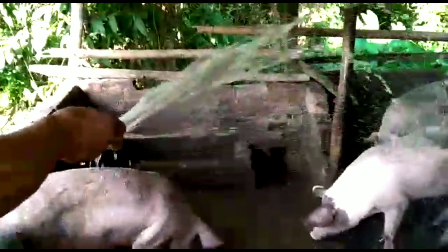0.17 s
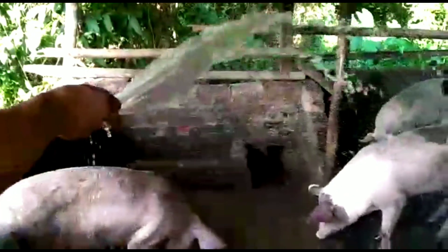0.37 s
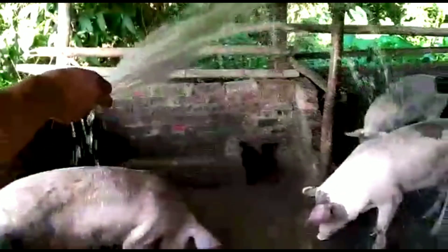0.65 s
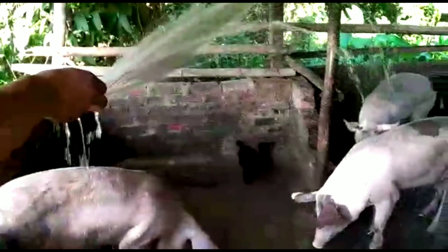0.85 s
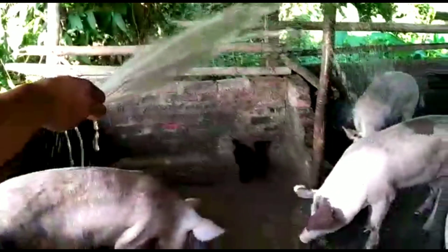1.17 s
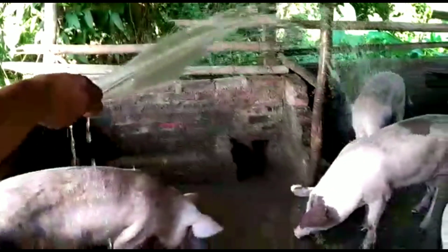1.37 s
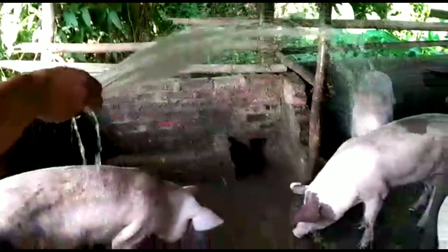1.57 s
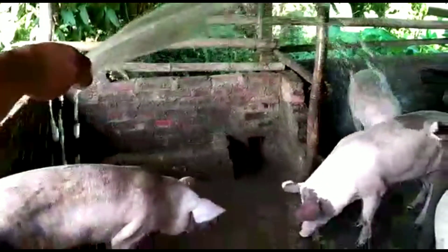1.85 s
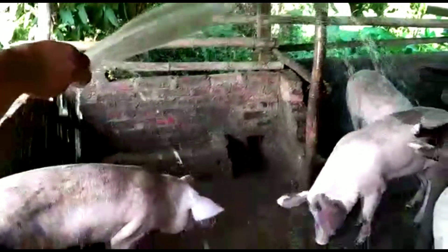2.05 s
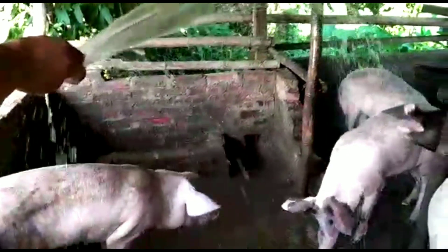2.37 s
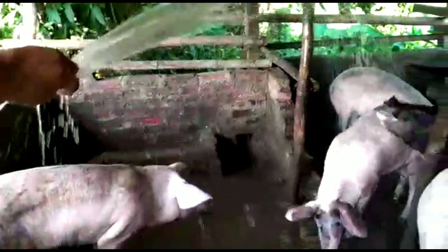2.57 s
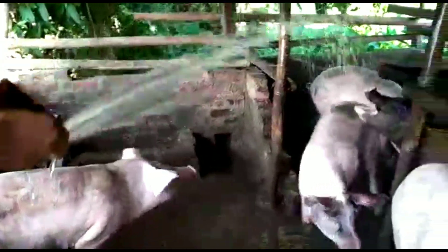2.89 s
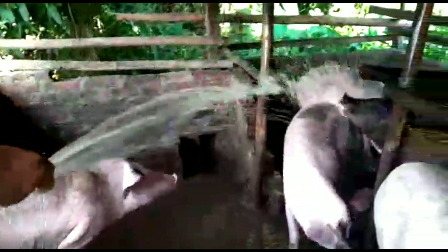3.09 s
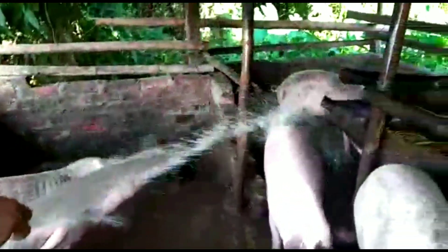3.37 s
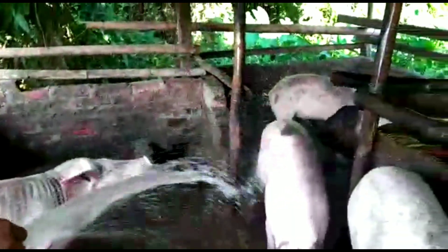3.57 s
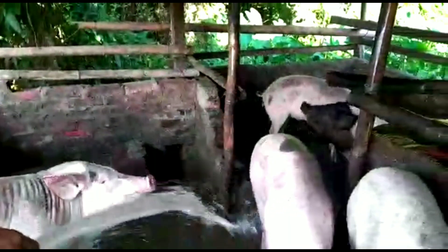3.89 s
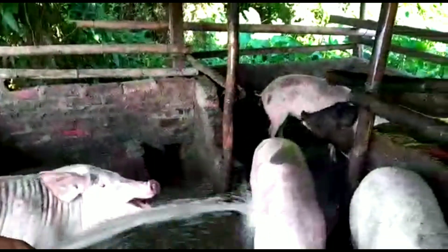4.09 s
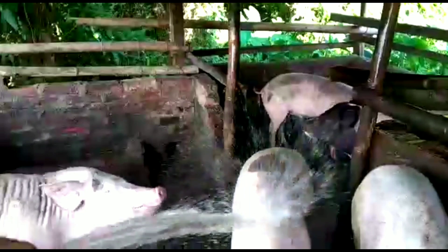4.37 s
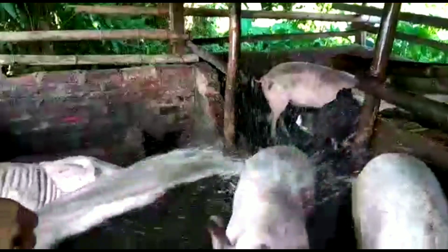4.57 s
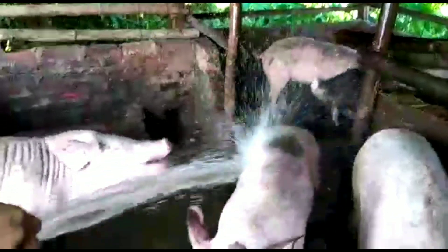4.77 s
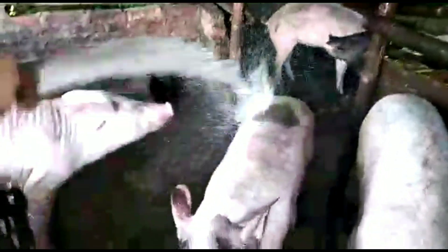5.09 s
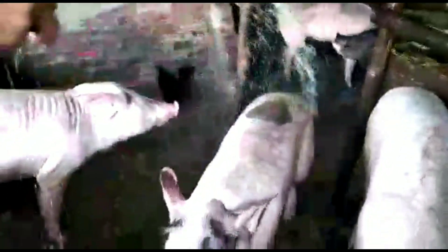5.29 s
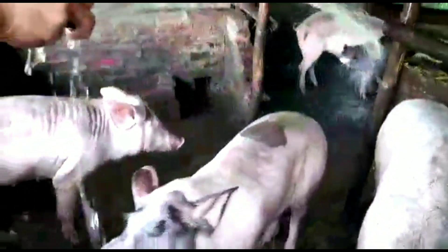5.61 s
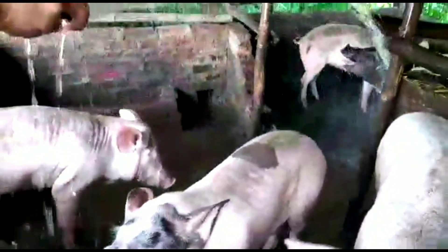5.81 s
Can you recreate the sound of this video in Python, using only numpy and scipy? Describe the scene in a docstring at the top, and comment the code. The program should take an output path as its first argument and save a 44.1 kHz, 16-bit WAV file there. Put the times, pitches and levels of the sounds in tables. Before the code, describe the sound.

Water from a hand-held hose is heard very close, in wide stereo, in an open pen with pigs. From the start the jet makes a bright, airy fizz with tiny glassy spits, while water breaks on the wet floor in mid-pitched splatter, crackle and gurgling bubbles. It surges unevenly: fuller gushes and sharp slaps come around 0.8 to 1.4 seconds, again near 1.9, and near 3.3. Crisp single drops pop near the microphone throughout. Beneath lie a soft low rumble, a wavering pump hum with a faint steady whine, and a slow engine further away, throbbing louder after about 3.5 seconds. Around 3.9 to 4.3 seconds the full jet pounds the floor with a lower wash and drums on hides. From about 4.9 to 5.5 seconds hollow wet knocks cluster, with drumming strongest near 5.3. Spray and splashes continue to the end, with another knock near 5.9.

```python
"""A hand-held hose sprays a fan of water over pigs and the wet floor of an open pen, close to two microphones.
From the start the jet fizzes at the thumb and splatters where it lands, while a pump hums and whines.
Slugs slap down and drops burst close by throughout; a slow engine further off throbs louder as time passes.
About four seconds in, the full jet pounds the floor; hides drum loudly then and again after five seconds,
with a cluster of wet knocks. Water is noise, bursts and short tones; machines are sines over a rumble."""
import sys
import numpy as np
from scipy import signal
from scipy.io import wavfile
from scipy.ndimage import uniform_filter1d

SR = 44100
rng = np.random.default_rng(int(sys.argv[2]) if len(sys.argv) > 2 else 0)


def dump_mix(stems):
    """Bounce the given channels to the path in sys.argv[1] as a 16-bit WAV at rate SR."""
    frames = np.atleast_2d(stems).T  # one column per channel
    limited = np.clip(frames, -1, 1)  # hard clip at full scale
    pcm = np.round(limited * 32767).astype(np.int16)
    wavfile.write(sys.argv[1], SR, pcm)


N = 261954  # samples in the scene


def amp(db):
    """Gain of a level in dB."""
    return 10 ** (np.asarray(db) / 20)


def evened(x):
    """Scaled to rms 1."""
    return x / np.sqrt(np.mean(x ** 2) + 1e-20)


def read(points, hz):
    """A spectrum table on a log-frequency axis."""
    f, value = np.transpose(points)
    return np.interp(np.log(hz + 1), np.log(f + 1), value)


def track(rows, column, t):
    """One column of a curve table at times t."""
    rows = np.array(rows)
    return np.interp(t, rows[:, 0], rows[:, column])


def drift(shape, *spans):
    """Random field of rms 1, smoothed over a span along each axis."""
    field = rng.standard_normal(shape)
    for axis, span in enumerate(spans):
        field = uniform_filter1d(field, max(int(span), 1), axis)
    return evened(field)


def add(mix, s, sound):
    """Mixes a two-channel sound in at time s."""
    part = mix[:, round(s * SR):][:, :sound.shape[1]]
    part += sound[:, :part.shape[1]]


def at_microphones(source, colour, size):
    """Colours two unrelated signals and mixes them as two spaced microphones hear them."""
    # Each row: frequency in Hz, left-right likeness from 0 to 1.
    likeness = [(60, 0.76), (200, 0.94), (500, 0.6), (1000, 0.74), (2000, 0.3), (6000, 0.038),
                (15000, 0.017)]
    # The phone body shades each microphone differently. Each row: frequency in Hz, left over right in dB.
    shading = [(60, -0.5), (250, 1), (1400, -3), (2200, -2.5), (3200, 2), (4400, 0.5), (5300, 1.5),
               (6200, 0), (7300, -3), (10200, -3), (11200, -1), (12500, 8), (13800, 0.5), (15000, -13.5)]
    # Arrival of the shared part. Each row: time in seconds, lead of the left in samples.
    left_lead = [(0, 9), (1, 9.5), (2.5, 5.5), (4.5, 5), (5.94, 8)]
    hz, t, (right, other) = signal.stft(source, SR, nperseg=size, noverlap=3 * size // 4)
    same = np.clip(read(likeness, hz), 0, 1)[:, None]
    early = np.exp(2j * np.pi * np.outer(hz / SR, track(left_lead, 1, t)))
    left = same * early * right + np.sqrt(1 - same ** 2) * other
    tilt = amp(read(shading, hz) / 2)[:, None]
    heard = np.array([left * tilt, right / tilt]) * amp(colour(hz, t))
    return signal.istft(heard, SR, nperseg=size, noverlap=3 * size // 4)[1][:, :N]


def surging(rows, column, surge_db):
    """A level curve in dB with chance surges on top: lumps of the jet arrive suddenly and trail off."""
    lumps_per_s, trail_s, step_s = 45, 0.023, .002
    t, steps = np.arange(N) / SR, np.arange(0, N / SR + .01, step_s)
    lumps = rng.exponential(1, len(steps)) * (rng.random(len(steps)) < lumps_per_s * step_s)
    surges = signal.lfilter([1], [1, -np.exp(-step_s / trail_s)], lumps)
    return track(rows, column, t) + surge_db * np.interp(t, steps, evened(surges - surges.mean()))


def gushes():
    """Heavy gushes as swells in dB, each with a quick start and a rounded fade."""
    # Each row: start in seconds, swell in dB before a layer takes its share, fade in seconds.
    rows = [(.585, 6, 0.054), (.893, 3, 0.018), (.948, 8.5, 0.079), (1.084, 10, 0.016), (1.167, 7, 0.013),
            (1.297, 8, 0.058), (1.355, 7, 0.018), (1.575, 3, 0.035), (1.935, 11, 0.033), (2.028, 1, .03),
            (2.44, 7, 0.025), (3.09, 2, 0.045), (3.232, 5.5, 0.045), (3.251, 1.5, 0.019), (3.281, 6, 0.046),
            (3.375, 8.5, 0.064), (3.67, 1.5, 0.075), (3.718, 4.5, 0.025), (3.84, 0, 0.04),
            (4.007, 4.5, 0.033), (4.084, 3, 0.056), (4.148, 8, 0.022), (4.32, 4.5, 0.068),
            (5.175, 6, 0.066), (5.419, 8.5, 0.033), (5.545, 5, 0.027)]
    t, rise_s = np.arange(N) / SR, 0.001
    swell_db = np.zeros(N)
    for s, db, fade_s in rows:
        swell_db += db * np.clip((t - s) / rise_s, 0, 1) * np.exp(-((t - s) / fade_s) ** 2)
    return swell_db


def water(spectrum, level_db, drops_per_s, spread_db, drop_share, patchy_db, flicker_db):
    """Dense far noise plus near drops; random patches over pitch and time, and a flicker of all pitches."""
    drop_sizes = amp(spread_db * np.minimum(rng.exponential(1, N), 5))
    sizes = drop_sizes * (rng.random((2, N)) < drops_per_s / SR)
    ring = np.exp(-np.arange(90) / 22)  # each drop is a burst fading in half a millisecond
    drops = signal.oaconvolve(sizes, ring[None], axes=1)[:, :N] * rng.standard_normal((2, N))
    share = np.clip(drop_share, 0, 1)  # share of the power
    source = np.sqrt(share) * evened(drops) + np.sqrt(1 - share) * rng.standard_normal((2, N))

    def colour(hz, t):
        """Spectrum in dB, with random patches over pitch and time and a flicker common to all pitches."""
        patches = patchy_db * drift((len(hz), len(t)), 2, 20)
        flicker = flicker_db * drift((1, len(t)), 1, 14)
        return read(spectrum, hz)[:, None] + patches + flicker
    return amp(level_db) * evened(at_microphones(source, colour, 256))


def short_tones(per_s, low_hz, high_hz, cycles, spread_db):
    """Short rising tones at chance times, as trapped air rings, dying away over a number of cycles."""
    out = np.zeros((2, N + SR))
    at = np.flatnonzero(rng.random(N) < per_s / SR)
    sizes = amp(spread_db * np.minimum(rng.exponential(1, N), 4))[at]
    kinds = rng.integers(0, 32, N)[at]
    for k, hz in enumerate(np.geomspace(low_hz, high_hz, 32)):
        steps = np.arange(int(3 * cycles * SR / hz))
        turns = steps * hz / SR
        envelope = np.exp(-turns / cycles) * (1 - np.exp(-turns))
        tone = np.sin(2 * np.pi * turns * (1 + 0.00151 * turns)) * envelope
        places = at[kinds == k, None] + steps
        sound = sizes[kinds == k, None] * tone
        out[k % 2] += np.bincount(places.ravel(), sound.ravel(), N + SR)  # pitches alternate sides
    return evened(out + 0.01 * out[::-1])[:, :N]


def burst(hz, width, t60, length=6000):
    """Two-channel noise around hz, quick rise and exponential fall."""
    t = np.arange(length) / SR
    edges = np.clip([hz - width / 2, hz + width / 2], 60, 15000)
    noise = rng.standard_normal((3, length))
    band = signal.butter(2, edges, "band", fs=SR, output="sos")
    noise = signal.sosfilt(band, noise[:2] + 0.33 * noise[2])
    return evened(noise) * amp(-60 * t / t60) * (1 - np.exp(-t / 0.0033))


def fizz(jet_db):
    """The jet tears at the thumb into bright noise with a few single drops."""
    # Each row: frequency in Hz, relative density in dB per Hz.
    spectrum = [(1800, -30.5), (3000, -7.5), (3600, -14), (4300, -6.5), (5200, -4.5), (6200, -4.5),
                (7200, 0.5), (8500, 0), (10200, 2), (11300, -1.5), (12500, -3.5), (13800, -6),
                (15000, -17.5), (15700, -9.5)]
    return amp(3.5) * water(spectrum, jet_db, drops_per_s=1100, spread_db=3.5, drop_share=0.064,
                            patchy_db=2.0, flicker_db=0.7)


def spit_and_shimmer(jet_db):
    """Very short tones and longer thin tones, a glassy shimmer, both following the jet."""
    spit = short_tones(per_s=1200, low_hz=3000, high_hz=6600, cycles=2.5, spread_db=4.0)
    shimmer = short_tones(per_s=700, low_hz=3300, high_hz=7000, cycles=30, spread_db=5.0)
    return amp(jet_db - 16) * (spit + shimmer)


def splatter(landing_db, gush_db):
    """Water breaking on the wet floor: mid-band noise with many drops, swelling with each gush."""
    # Each row: frequency in Hz, relative density in dB per Hz.
    spectrum = [(900, -24), (1400, -11.5), (2000, -7.5), (2350, 1), (2650, 3.5), (2950, 3), (3300, -8),
                (4200, -7), (6500, -19)]
    return amp(1.5) * water(spectrum, landing_db + .75 * gush_db, drops_per_s=1500, spread_db=1.5,
                            drop_share=0.4, patchy_db=1.4, flicker_db=1.2)


def puddle_bubbles(landing_db, gush_db):
    """Air caught in the puddles: long tones gurgle, short ones crackle and crowd together in a gush."""
    gurgle = short_tones(per_s=500, low_hz=1930, high_hz=3238, cycles=35, spread_db=1.0)
    crowd_per_s = 250 * amp(1.3 * gush_db)
    crackle = short_tones(crowd_per_s, low_hz=1900, high_hz=4200, cycles=2.5, spread_db=3.0)
    return amp(landing_db + 0.79 * gush_db - 12.5) * gurgle + amp(landing_db + .3 * gush_db - 7) * crackle


def drumming(drumming_db):
    """Water beats on hides as low noise, with plops of low bubbles equal at both microphones."""
    # Each row: frequency in Hz, relative density in dB per Hz.
    spectrum = [(150, 5.5), (250, -10.5), (400, -9.5), (600, -0.5), (900, -2.5), (1300, 2), (2200, -16)]
    beating = amp(3.5) * water(spectrum, drumming_db, drops_per_s=520, spread_db=1.5, drop_share=0.15,
                               patchy_db=2.5, flicker_db=-1.0)
    plops = short_tones(per_s=220, low_hz=418.5, high_hz=1406, cycles=8.4, spread_db=3.5).mean(0)
    return beating + amp(drumming_db - 5.0) * plops


def pounding():
    """Low wash of the full jet pounding the floor, as noise with uneven drops."""
    # Each row: frequency in Hz, relative density in dB per Hz.
    spectrum = [(120, -17), (200, 5), (300, 0), (450, -6), (800, -16), (1300, -19)]
    # Each row: time in seconds, level in dB before surges.
    level = [(0, -60), (3.8, -59), (3.9, -35), (4.05, -45), (4.25, -33), (4.4, -45), (4.75, -48), (5, -52),
             (5.94, -59)]
    return water(spectrum, surging(level, 1, surge_db=1.5), drops_per_s=580, spread_db=6.0,
                 drop_share=0.18, patchy_db=3.5, flicker_db=0.5)


def slaps():
    """Each slug of water lands with a sharp crack and spreads into spatter that dies in tenths of a second."""
    # Each row: start in seconds, relative level in dB, centre in Hz, left over right in dB.
    rows = [(0.804, -13.5, 3094, 0), (0.892, -19, 2220, -1), (0.9503, -14.5, 2570, -3),
            (0.965, -34, 2320, 1), (0.974, -31, 2800, 0), (1.17, -19, 2800, 2), (1.3075, -12.5, 2520, -1),
            (1.335, -24, 2500, -3), (1.36, -22, 2630, -3), (1.44, -22, 2330, 0), (1.727, -31, 2820, -1),
            (1.935, -31, 2460, -3), (2.184, -17, 2750, -2), (2.4494, -33, 2340, -5), (2.5652, -25, 3070, 1),
            (2.698, -25, 2970, -2), (3.09, -18, 1880, -3), (3.289, -19, 2900, 3), (3.295, -26, 2300, 0),
            (3.384, -25, 2410, -3), (3.844, -20, 2710, 9), (4.019, -13.5, 2600, 5), (4.099, -19, 2840, 11),
            (4.452, -21, 2700, 1), (4.977, -22, 2580, -4), (5.063, -28, 2490, 1), (5.297, -19, 2530, 1),
            (5.358, -15, 2400, -2), (5.499, -14, 3430, 1.5), (5.869, -16, 2460, -7)]
    out, t = np.zeros((2, N)), np.arange(6000) / SR
    for s, db, hz, pan_db in rows:
        crack = np.sin(2 * np.pi * hz * t) * amp(5 - 60 * t / .008) * np.minimum(t / .0008, 1)
        spatter = amp(-3.5) * burst(hz, 1350, 0.17) + amp(-4.5) * burst(6500, 6900, 0.37)
        sides = amp([[pan_db / 2], [-pan_db / 2]])
        add(out, s, amp(db) * sides * (crack + spatter))
    return out


def ticks():
    """Large single drops burst near the microphone as bright noise a few milliseconds long."""
    # Each row: start in seconds, peak in dB.
    rows = [(0.158, -8), (0.365, -10), (0.536, -5), (0.5865, -1.5), (1.1772, -5), (1.501, -2), (2.0078, -6),
            (2.1504, -1), (2.5456, -3.5), (2.7187, -5), (3.0964, -17), (3.2258, -2), (3.607, -6),
            (3.6381, -14), (3.688, -3), (3.9948, -14), (4.2727, -12), (4.3251, -4), (5.5165, -0.5),
            (5.8416, -17), (5.8729, -2)]
    out = np.zeros((2, N))
    for s, db in rows:
        tick = burst(10500, 9900, 0.013, length=400)
        add(out, s, amp(db) * tick / abs(tick).max())
    return out


def knocks():
    """Wet knocks on hide and wood: a smack, and a ring of trapped air, rattle, thud and spatter held a while."""
    # Each row: start in seconds, relative level in dB, starting pitch in Hz, thud share in dB,
    # time in seconds that the water presses on.
    rows = [(0.186, -39, 572, 4, 0.031), (0.639, -42, 285, -5, 0.017), (1.547, -41.5, 580, -17, .03),
            (1.622, -42, 292, -14, 0.024), (2.001, -38, 940, -10, 0.025), (3.669, -41.5, 968, -17, 0.037),
            (4.426, -31, 917, -22, 0.015), (4.862, -29.5, 970, -25, 0.018), (4.937, -30.5, 571, -3, 0.043),
            (4.986, -27, 990, -20, 0.009), (5.052, -38, 1220, -25, 0.016), (5.112, -27.5, 736, -17, 0.0081),
            (5.123, -31.5, 578, -5, 0.029), (5.01, -36.5, 580, -10, 0.013), (5.175, -30, 730, -20, .012),
            (5.19, -31, 588, -14, .015), (5.231, -25, 1576, -32, 0.016), (5.236, -22.5, 2020, -30, 0.029),
            (5.229, -29, 1018, -20, 0.025), (5.297, -22.5, 560, -5, 0.053), (5.298, -37, 1000, -20, .012),
            (5.3, -42, 1303, -25, .015), (5.359, -27, 540, -20, 0.007), (5.361, -30.5, 977, -28, 0.021),
            (5.422, -28.5, 558, -30, 0.03), (5.455, -32, 628, -25, 0.015), (5.52, -33, 723, -25, .02),
            (5.488, -27, 660, -13, 0.031), (5.49, -32, 1010, -25, 0.0088), (5.588, -33, 1085, -19, 0.012),
            (5.696, -37.5, 314, -24, 0.0093), (5.847, -38, 1050, -20, 0.0094), (5.866, -30, 570, -18, 0.11),
            (5.868, -36, 840, -15, 0.051), (5.872, -30, 296.5, -16, 0.093)]
    out, t = np.zeros((2, N)), np.arange(6000) / SR
    for s, db, hz, thud_db, hold_s in rows:
        held = (1 - np.exp(-t / 0.0003)) * amp(-60 * np.maximum(t - hold_s, 0) / 0.06)
        ring = np.sin(2 * np.pi * hz * (t + .9 * t ** 2)) * amp(-60 * t / .35)  # pitch rises
        ring = ring * amp(-2 + 3.5 * drift(len(t), 200))  # broken up by the splashing
        rattle = amp(-5.0) * burst(hz, 270, 1.0).mean(0)
        thud = amp(thud_db) * burst(243, 190, 0.45).mean(0)
        smack = amp(3.5) * burst(1240, 1810, 0.062).mean(0)
        spatter = burst(1420, 1670, 0.17)
        add(out, s, amp(db) * (smack + held * (ring + rattle + thud + spatter)))
    return out


def wander(span):
    """Slow random curve of rms 1 over the scene, smoothed over a span of its 600 steps."""
    t = np.arange(N) / SR
    steps = np.linspace(0, t[-1], 600)
    return np.interp(t, steps, drift(len(steps), span))


def slip():
    """Wandering phase in turns, as the air path shifts."""
    return 0.04 * wander(40)


def pump():
    """The electric pump: a shaft hum with its third harmonic, and a whine of fixed pitch, wavering in level."""
    # Each row: time in seconds, shaft rate in Hz, hum level in dB before wavering.
    rows = [(0, 48, -37), (1.4, 48.1, -34), (1.6, 47.1, -37.5), (1.85, 45.9, -43), (2.0, 46, -36),
            (2.45, 46.5, -44), (2.89, 48.05, -35), (3.5, 47.7, -34.5), (3.79, 48, -38.5), (4.0, 47.5, -46),
            (4.2, 47.5, -39), (4.5, 47.57, -37), (4.9, 47.6, -35), (5.94, 48, -34.5)]
    t = np.arange(N) / SR
    shaft = 2 * np.pi * (np.cumsum(track(rows, 1, t)) / SR + slip())
    hum_db = track(rows, 2, t)
    hum = amp(hum_db + .8 * wander(21) + 1.5 * wander(4)) * np.sin(shaft)
    third = amp(hum_db.mean() - 14 + 2.3 * wander(21)) * np.sin(3 * shaft)
    whine = amp(-50 + 1.5 * wander(21)) * np.sin(2 * np.pi * 1232 * t)
    return np.sqrt(2) * (hum + third) * amp([[.4], [-.4]]) + whine * amp([[2.5], [-2.5]])


def engine():
    """The slow engine's orders: sines loosely in step as firing pulses, each wavering in level."""
    # Each row: multiple of the firing rate, level in dB when far, level in dB when near, before wavering.
    orders = [(1, -55, -55), (3, -53, -52), (4, -53.5, -45), (5, -49, -50), (6, -57, -40.5), (7, -60, -34),
              (8, -55, -45), (10, -51, -48), (11, -81, -41.5), (12, -55, -54), (13, -73, -59)]
    # Each row: time in seconds, firings per second.
    speed = [(0, 16.5), (.7, 16.78), (1.4, 17.14), (2.1, 17.5), (2.8, 17.84), (3.2, 18), (4.3, 18.1),
             (4.9, 17.95), (5.94, 18.15)]
    # Each row: time in seconds, nearness from 0 to 1.
    nearness = [(0, 0), (1.5, 0.34), (3.3, 0.38), (3.8, 0.77), (4.5, 0.95), (5.94, 0.93)]
    t = np.arange(N) / SR
    turns, near = np.cumsum(track(speed, 1, t)) / SR, track(nearness, 1, t)
    throb = np.zeros(N)
    for k, far_db, near_db in orders:
        level_db = far_db + near * (near_db - far_db) + 1.04 * wander(21) + 1.5 * wander(4)
        start = .4 * rng.random()  # random starting phase in turns, which softens the pulses
        throb += amp(level_db) * np.cos(2 * np.pi * (k * turns + start + slip()))
    return np.sqrt(2) * throb * amp([[.4], [-.4]])


def rumble():
    """A low steady rumble behind everything, as coloured noise."""
    # Each row: frequency in Hz, relative density in dB per Hz.
    spectrum = [(12, -24), (22, -1), (32, 4), (43, -1), (65, 12), (102, -3), (166, -3), (357, -22),
                (500, -41), (650, -41), (1100, -120)]
    noise = rng.standard_normal((2, N))
    return amp(-40.5) * evened(at_microphones(noise, lambda hz, t: read(spectrum, hz)[:, None], 1700))


def scene():
    """All sources at the two microphones; layers of the same water share its level curve."""
    # Jet at the thumb. Each row: time in seconds, relative level in dB.
    jet = [(0.0, -14), (0.26, -25), (.33, -25), (.37, -21.5), (.51, -21), (0.59, -15.5), (0.69, -21),
           (0.73, -17), (0.78, -22.5), (0.83, -16.5), (1.01, -19), (1.45, -19.5), (1.6, -17), (1.67, -21.5),
           (1.75, -17.5), (2.2, -19.5), (2.4, -19.5), (2.45, -17), (2.53, -21), (2.56, -18), (2.86, -19.5),
           (3.09, -19), (3.27, -14), (3.37, -14), (3.5, -19.5), (3.6, -27), (3.612, -18.5), (3.642, -14.5),
           (3.655, -18.5), (3.685, -18.5), (3.7, -13.5), (3.8, -15), (4.45, -15), (4.55, -18), (4.85, -16),
           (4.95, -18.5), (5.19, -16), (5.29, -23), (5.43, -18), (5.47, -17.5), (5.54, -15), (5.66, -17.5),
           (5.79, -23), (5.91, -15), (5.94, -14)]
    # Where the water lands. Each row: time in seconds, relative level on the floor in dB, on hides in dB.
    landing = [(0.0, -24, -49), (0.22, -34.5, -44.5), (.55, -30, -44.5), (0.9, -25.5, -48),
               (1.05, -31, -47.5), (2.74, -27, -46), (3.01, -31, -44.5), (3.33, -24, -46),
               (3.59, -38.5, -47), (3.655, -27, -50), (3.675, -24.5, -50), (3.77, -26.5, -43),
               (3.85, -21, -42.5), (3.92, -21, -38.5), (4.06, -25, -35.5), (4.19, -26, -34.5),
               (4.22, -23.5, -48), (4.3, -34, -49), (4.4, -30.5, -43), (4.83, -31.5, -42.5),
               (5.1, -27.5, -36.5), (5.28, -27.5, -32), (5.45, -28.5, -37), (5.62, -23, -43.5),
               (5.84, -34, -44), (5.88, -28, -39), (5.94, -22.5, -36)]
    jet_db, gush_db = surging(jet, 1, surge_db=0.39), gushes()
    landing_db = surging(landing, 1, surge_db=1.07)
    hides_db = surging(landing, 2, surge_db=1.0)
    spray = fizz(jet_db) + spit_and_shimmer(jet_db)
    floor = splatter(landing_db, gush_db) + puddle_bubbles(landing_db, gush_db) + pounding()
    hits = slaps() + ticks() + knocks()
    return spray + floor + drumming(hides_db) + hits + pump() + engine() + rumble()


def record(dry):
    """Peaks clip just below full scale, then a steep low-pass sets the band limit."""
    low_pass = signal.firwin(2047, 15520, window=("kaiser", 9), fs=SR)  # edge in Hz
    return signal.oaconvolve(np.clip(dry, -.99, .99), low_pass[None], "same")


dry = scene()
out = record(dry)
dump_mix(out)
```